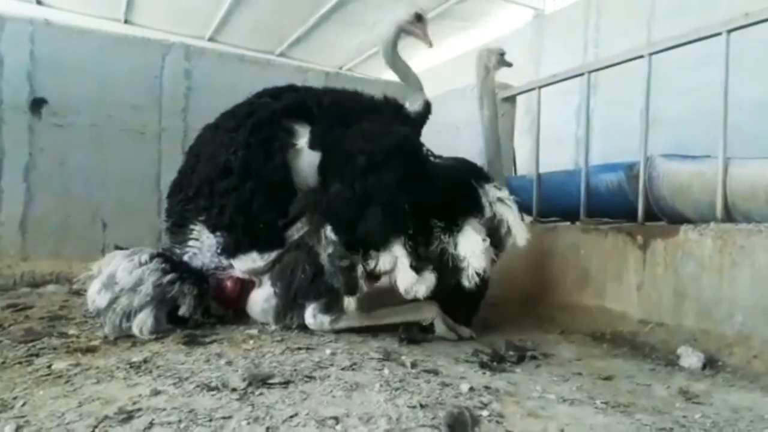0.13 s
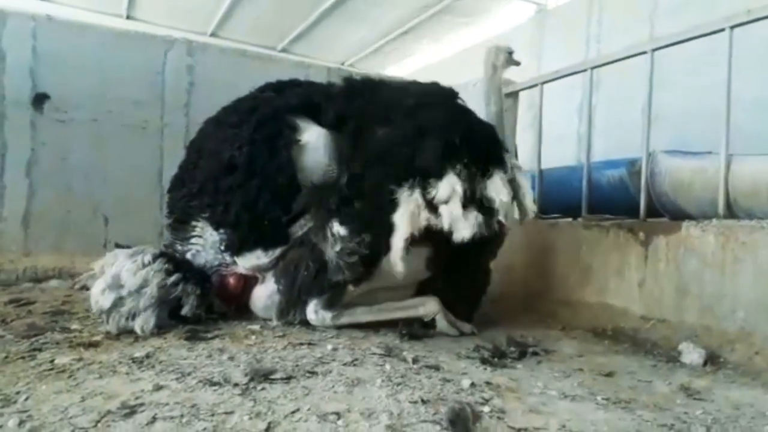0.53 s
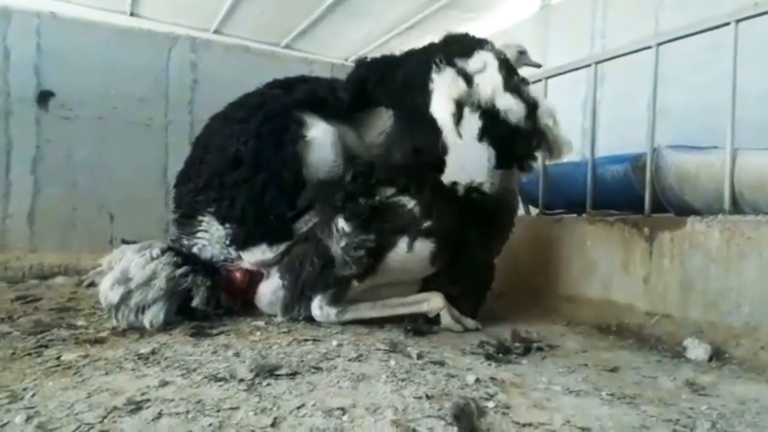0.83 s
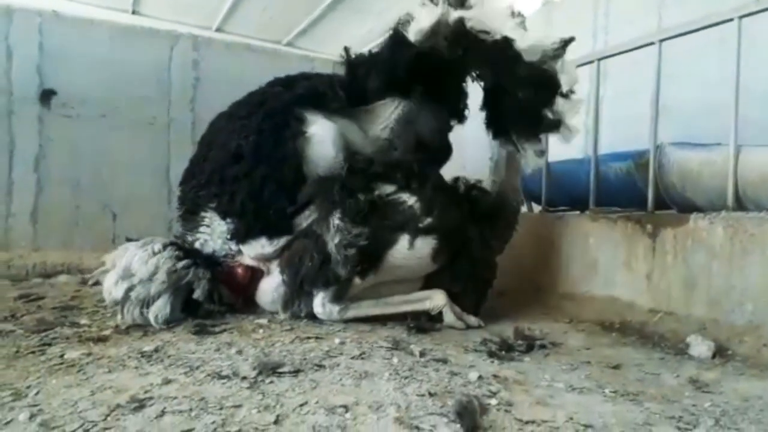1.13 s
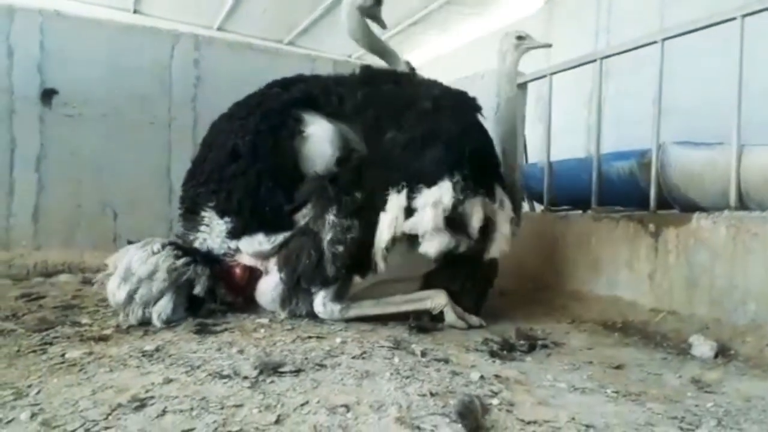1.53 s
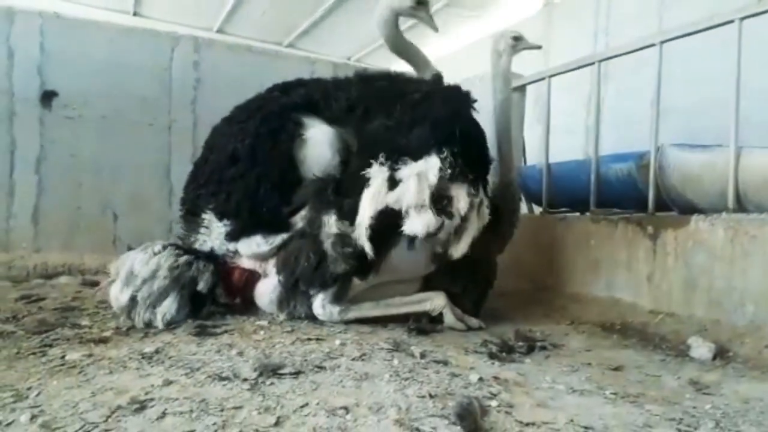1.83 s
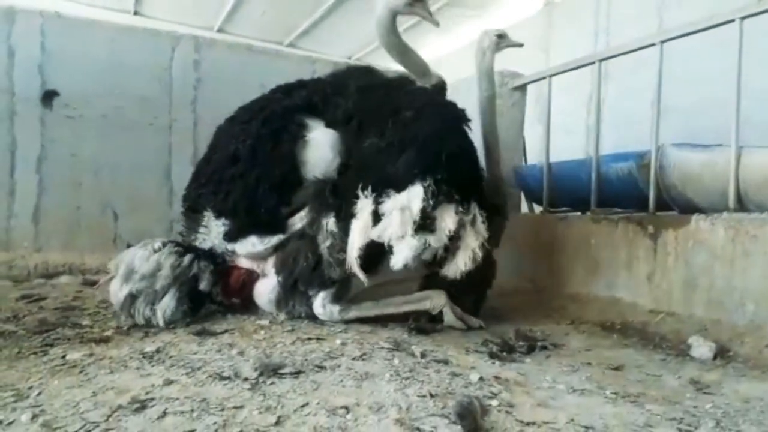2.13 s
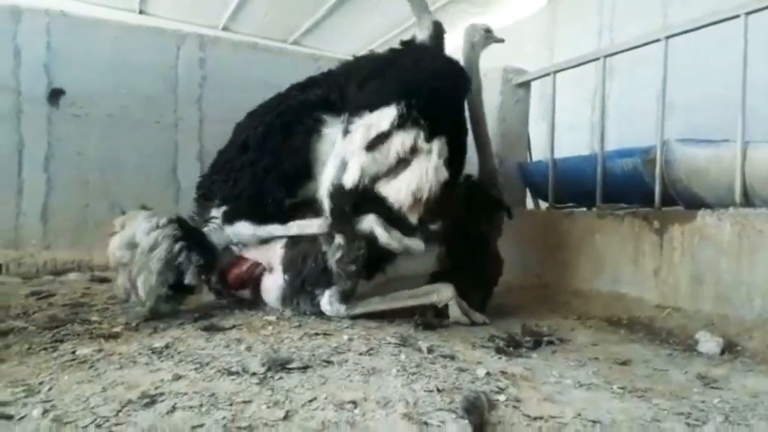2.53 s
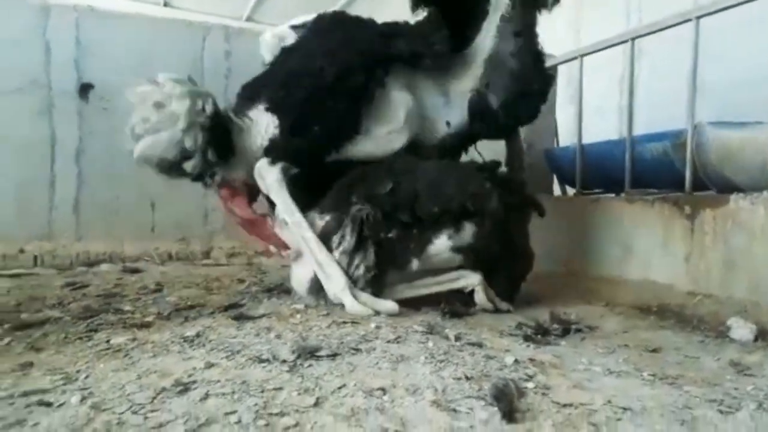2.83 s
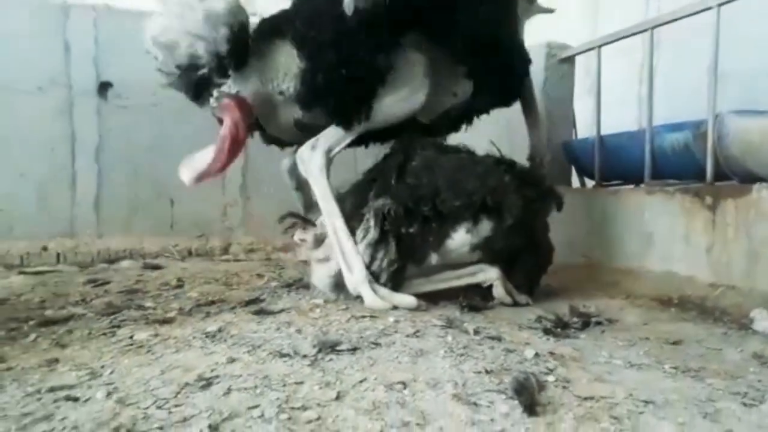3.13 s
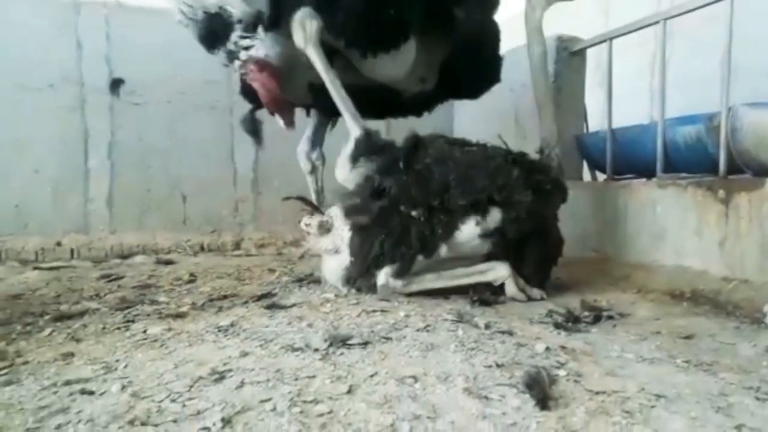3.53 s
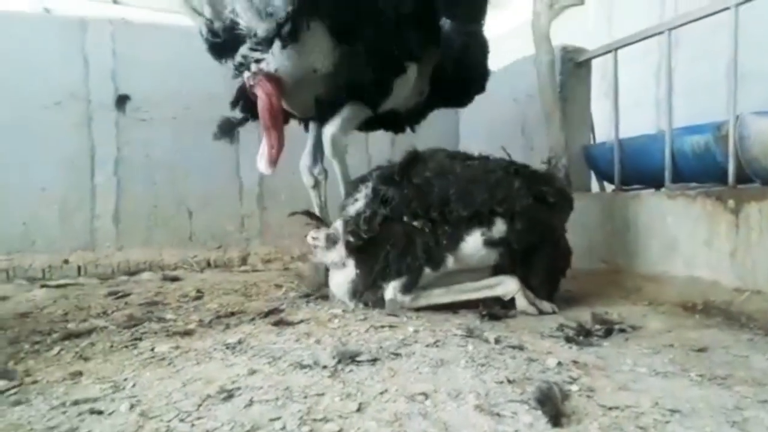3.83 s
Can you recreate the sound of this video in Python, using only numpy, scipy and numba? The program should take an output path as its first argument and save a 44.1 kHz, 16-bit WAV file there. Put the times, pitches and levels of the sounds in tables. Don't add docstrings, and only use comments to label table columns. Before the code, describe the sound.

The end of a low, raspy ostrich groan in a small hard-walled shed, then low wing-air bumps, quiet rustle and faint hum, finally a burst of footfalls, grit scuffs and claw clicks, on a dull phone microphone.

```python
import sys
import numpy as np
from scipy import signal
from scipy.io import wavfile
from scipy.ndimage import uniform_filter1d
from numba import njit

SR = 44100
rng = np.random.default_rng(int(sys.argv[2]) if len(sys.argv) > 2 else 0)


def generate_wav(sig):
    pcm = np.round(np.clip(np.atleast_2d(sig).T, -1, 1) * 32767).astype(np.int16)
    wavfile.write(sys.argv[1], SR, pcm)


def gain_from_db(level_db):
    decades = np.asarray(level_db, float) / 20
    return 10 ** decades


N = 176400


def unit(x):
    return x / np.sqrt(np.mean(x ** 2))


@njit
def svf(x, hz, width):
    y, b, l = np.empty(len(x)), 0., 0.
    g, k = np.tan(np.pi * hz / SR), width / hz
    for i in range(len(x)):
        v = (b + g * (x[i] - l)) / (1 + g * (g + k))
        b, l, y[i] = 2 * v - b, l + 2 * g * v, k * v
    return y


def resonate(x, hz, width_hz):
    hz, width_hz = float(hz), float(width_hz)
    return svf(svf(x, hz, width_hz), hz, width_hz)


def walk(rate_hz, size=N):
    k = int(SR / rate_hz)
    steps = np.repeat(rng.standard_normal(size // k + 1), k)
    return 1.855 * uniform_filter1d(uniform_filter1d(steps, k), k)[:size]


def grit():
    grains_per_s, uneven_db, bed = 2500, 2.5, .5
    hit = rng.random(N) < grains_per_s / SR
    grains = hit * rng.standard_normal(N) * gain_from_db(uneven_db * rng.exponential(size=N))
    return unit(grains + bed * rng.standard_normal(N))


def bands(spectrum, source):
    flicker_db = 1.8
    hz0, db0 = np.array(spectrum).T
    out, swell = 0, walk(5.42)
    for k, hz in enumerate(40 * 2 ** (np.arange(24) / 3)):
        db = np.interp(np.log(hz), np.log(hz0), db0) + flicker_db * (walk(18) + .5 * swell)
        shifted = np.roll(source, k * SR // 7)
        out = out + gain_from_db(db) * resonate(shifted, hz, hz / 3)
    return unit(out)


def boom():
    # time in seconds, pulse rate in Hz, effort in dB, airflow in dB,
    # brightness above the third harmonic in dB per octave.
    course = [
        (0, 68.06, -30.5, -30, -1.5),
        (.07, 69.9, -30, -27.5, -2),
        (0.141, 69.2, -36.5, -30, -1),
        (0.201, 65.74, -38.5, -35, -7),
        (0.269, 64.87, -37, -36, -2),
        (0.33, 62.95, -38.5, -34, 1.5),
        (.44, 60.24, -39.5, -42.5, -7),
        (0.521, 60.1, -49, -42.5, -19),
        (.62, 56.4, -61, -65, -6),
    ]
    # centre in Hz, width in Hz, level in dB.
    neck_modes = [(74.6, 9.3, -6), (120, 9.8, -3), (139.8, 14.6, -3), (182, 14, 2.5), (260.7, 6.6, -3.5),
                  (307.6, 13.8, -0.5), (346.5, 13, 0.5), (479, 43, -31.5), (575, 48, -26)]
    # centre in Hz, width in Hz, level in dB.
    throat_modes = [(750, 820, -13.5), (1266, 140, -10.5), (1668, 73, -5), (1770, 140, -5.5),
                    (1896, 30, 0.5), (2644, 130, -17), (4230, 750, -21), (5600, 1400, -34)]
    jitter, shimmer_db, growl_db, neck_broad = .012, 2.2, -10, 2.14
    rumble_db, rumble_hz, rumble_width_hz = -14, 210, 330
    rumble_lag = .75
    rasp_db, rasp_gate_cycles, air_flicker_db = -21, 0.94, 1.2

    lead, n = SR // 4, SR
    t = (np.arange(n) - lead) / SR
    s, hz, db, air_db, bright_db = np.array(course).T
    phase = np.cumsum(np.interp(t, s, hz) * (1 + jitter * walk(40.34, size=n))) / SR
    past_end_s = np.clip(t - s[-1], 0, 1)
    effort_db = np.interp(t, s, db) - 300 * past_end_s
    tilt_db = np.interp(t, s, bright_db)

    pulses = 0
    for k in range(1, 10):
        harmonic_db = shimmer_db * walk(30.3, size=n) + tilt_db * max(np.log2(k / 3), 0)
        pulses = pulses + gain_from_db(harmonic_db) * np.cos(2 * np.pi * k * phase)
    turbulence = rng.standard_normal(n)
    driven = (pulses + 10 * gain_from_db(growl_db) * turbulence) * gain_from_db(effort_db)
    voice = 0
    for k, (f, w, d) in enumerate(neck_modes):
        voice = voice + (-1) ** k * gain_from_db(d) * resonate(driven, f, neck_broad * w)

    rumble = unit(resonate(turbulence, rumble_hz, rumble_width_hz))
    rumble = rumble * gain_from_db(rumble_db + db[0] + rumble_lag * (effort_db - db[0]))

    gate = 0.47 + np.exp(-(phase % 1) / rasp_gate_cycles)
    flow_db = air_flicker_db * walk(27.25, size=n) + np.interp(t, s, air_db) - 380 * past_end_s
    air = rng.standard_normal(n) * gate * gain_from_db(flow_db)
    rasp = sum(gain_from_db(d) * resonate(air, f, 2 * w) for f, w, d in throat_modes)
    return np.r_[(voice + rumble + 10 * gain_from_db(rasp_db) * rasp)[lead:], np.zeros(N - n + lead)]


def rustle():
    # frequency in Hz, density in dB per Hz.
    spectrum = [(60, 0), (130, 3), (250, -1.5), (700, -6), (1200, -6.5), (2100, -5), (4200, -15),
                (7000, -35.5)]
    # time in seconds, level in dB.
    stir = [(.5, -59.5), (.7, -64.5), (1.1, -62.5), (1.45, -69), (1.55, -63), (2.0, -64), (2.4, -62),
            (2.55, -59), (2.7, -52.5), (2.95, -55.5), (3.12, -58), (3.18, -61.5), (3.35, -65.5),
            (3.55, -57), (3.75, -68), (3.9, -56.5)]
    stir_db = np.interp(np.arange(N) / SR, *np.array(stir).T)
    return bands(spectrum, grit()) * gain_from_db(stir_db - 1.5)


def shed_hum():
    # frequency in Hz, density in dB per Hz.
    spectrum = [(30, -39.5), (70, -8.5), (218, 3), (683, -21), (2430, -29.5), (4590, -22.5), (7000, -23)]
    return bands(spectrum, rng.standard_normal(N)) * gain_from_db(-67.5)


def knocks():
    # start in seconds, peak in dB, ring in Hz, t60 in seconds.
    hits = [(.367, -48.5, 3320, 0.054), (1.913, -55, 1530, 0.041), (1.938, -47.5, 1260, 0.016),
            (1.979, -45.5, 760, 0.01), (2.064, -51.5, 1520, 0.024), (2.153, -47, 670, 0.015),
            (2.178, -44, 660, 0.015), (2.214, -61, 2150, .02), (2.381, -52, 1620, .02),
            (2.446, -47.5, 590, 0.041), (2.513, -50, 2070, .02), (2.707, -37.5, 640, 0.038),
            (2.713, -40, 1230, .02), (2.773, -46, 613, 0.025), (2.791, -37.5, 1190, 0.02),
            (2.798, -40.5, 897, .03), (2.854, -42.5, 750, 0.037), (2.869, -32.5, 3950, 0.011),
            (2.869, -38.5, 1710, 0.02), (2.881, -43, 2210, 0.048), (2.91, -26.5, 1162, 0.024),
            (2.91, -30.5, 742, 0.027), (2.909, -35.5, 3530, 0.023), (2.91, -44, 4100, 0.034),
            (2.922, -44, 1104, 0.037), (2.997, -43.5, 534, 0.033), (3.022, -50, 6500, .008),
            (3.022, -47, 9500, .006), (3.022, -37, 12600, .008), (3.027, -39.5, 754, 0.026),
            (3.031, -36.5, 1133, 0.035), (3.029, -41.5, 4050, 0.028), (3.034, -40, 6900, .012),
            (3.034, -39, 5220, 0.014), (3.035, -46, 12300, .008), (3.047, -42.5, 4170, 0.013),
            (3.188, -41.5, 870, .015), (3.196, -43, 750, 0.025), (3.203, -53, 980, .02),
            (3.214, -49, 2300, 0.023), (3.254, -51, 1820, 0.033), (3.284, -39.5, 1050, 0.012),
            (3.383, -54.5, 2440, .02), (3.448, -48, 675, 0.017), (3.453, -47, 1150, 0.022),
            (3.48, -50.5, 1160, 0.024), (3.848, -52, 1600, .02), (3.889, -47, 1550, .02),
            (3.928, -46, 604, .03)]
    rise_s = 0.00035
    out, u = np.zeros(N + SR), np.arange(SR // 5) / SR
    for s, db, hz, t60_s in hits:
        ring = np.sin(2 * np.pi * hz * u) + 0.14 * np.sin(2 * np.pi * 0.99 * hz * u)
        ring = ring + 0.38 * unit(resonate(rng.standard_normal(len(u)), hz, hz / 2))
        shape = np.exp(-np.log(1000) * u / t60_s) * (1 - np.exp(-u / rise_s)) ** 2
        i = int(s * SR)
        out[i:i + len(u)] += 0.72 * gain_from_db(db) * ring * shape
    return out[:N]


def scuffs():
    # start in seconds, length in seconds, level in dB, centre in Hz, width in Hz.
    drags = [(0.679, 0.021, -54.5, 3190, 523), (1.133, 0.022, -57, 2280, 400),
             (0.55, 0.22, -75.5, 5600, 3100), (1.331, 0.03, -68.5, 3240, 400),
             (1.32, 0.033, -74, 4540, 500), (1.366, 0.015, -71, 1600, 250),
             (1.719, 0.033, -68.5, 2950, 1200), (1.744, 0.064, -66, 1680, 500),
             (1.865, 0.016, -68, 2900, 1500), (1.969, 0.061, -64, 1770, 2440),
             (2.226, 0.064, -68.5, 4560, 1530), (2.51, 0.054, -65, 2380, 3000),
             (2.596, 0.17, -64, 4640, 3020), (2.773, 0.04, -58, 1930, 2860), (2.684, 0.032, -60, 3900, 700),
             (2.784, 0.2, -68, 3930, 1210), (2.891, 0.059, -55.5, 2080, 315),
             (3.015, 0.036, -60.5, 5630, 5000), (3.183, 0.036, -57, 990, 1100),
             (3.21, 0.052, -63, 1840, 2000), (3.44, 0.13, -63, 1630, 2470),
             (3.436, 0.079, -67.5, 3400, 2480), (3.52, 0.032, -62, 2200, 700),
             (3.653, 0.038, -65, 2000, 495), (3.706, .03, -69, 1870, 400), (3.835, 0.14, -61.5, 1210, 2580)]
    rise_share, fall_s, flicker_db = 0.3, 0.013, 1.5
    out, u = np.zeros(N + SR), np.arange(SR // 2) / SR
    grains = grit() * gain_from_db(flicker_db * walk(90))
    for s, length_s, db, hz, width_hz in drags:
        i = int(s * SR)
        rise = np.clip(u / (rise_share * length_s), 0, 1)
        fall = np.exp(-np.clip(u - length_s, 0, 9) / fall_s)
        drag = unit(resonate(np.roll(grains, -i)[:len(u)], hz, width_hz))
        out[i:i + len(u)] += gain_from_db(db) * rise * fall * drag
    return out[:N]


def bumps(table, spread_cycles, snap_db):
    rise_share, sag, wake_db, wake_s = 0.65, 0.46, -14, 0.039
    out, u = np.zeros(N + SR), np.arange(-SR // 20, SR // 5) / SR
    for (s, db, hz), turn in zip(table, rng.random(len(table))):
        c = hz * u
        slow = np.where(c < 0, rise_share, 1) * spread_cycles
        sagging = c - sag * c * np.tanh(c) / 2
        swing = np.exp(-.5 * (c / slow) ** 2) * np.cos(2 * np.pi * (sagging + turn))
        snap = np.exp(-.5 * ((c + 0.28) / (0.52 * spread_cycles)) ** 2)
        snap = snap * np.cos(2 * np.pi * (2.74 * c + turn))
        wake = unit(resonate(rng.standard_normal(len(u)), hz, hz))
        wake = wake * np.exp(np.minimum(-u, 8 * u) / wake_s)
        i = int(s * SR) - SR // 20
        out[i:i + len(u)] += gain_from_db(db) * (swing + gain_from_db(snap_db) * snap + gain_from_db(wake_db) * wake)
    return out[:N]


def wing_puffs():
    # peak time in seconds, peak in dB, swing in Hz.
    strokes = [(.706, -45, 109), (.826, -36, 106), (.857, -44.5, 94), (.912, -42, 83), (.932, -38, 86),
               (.95, -50, 89), (.969, -41, 93), (1.009, -47, 81), (1.031, -51, 89), (1.122, -25.5, 113),
               (1.161, -33, 100.6), (1.187, -41, 149), (1.237, -39.5, 107), (1.265, -53, 100),
               (1.302, -40.5, 213), (1.306, -46, 80), (1.333, -54, 109), (1.354, -42.5, 90),
               (1.385, -61, 324), (1.491, -42.5, 111), (1.556, -57, 84), (1.58, -42.5, 121.5)]
    return bumps(strokes, spread_cycles=0.73, snap_db=-22)


def thuds():
    # peak time in seconds, peak in dB, swing in Hz.
    falls = [(1.887, -46, 214), (1.983, -47, 240), (2.158, -47, 166), (2.183, -46.5, 216),
             (2.462, -44, 218), (2.714, -39, 230), (2.748, -46, 205), (2.776, -34.5, 246),
             (2.799, -35.5, 249), (2.821, -48, 205), (2.854, -50, 200), (2.914, -46, 175),
             (2.937, -45.5, 202), (3.01, -42, 120), (3.045, -52, 102), (3.231, -45.5, 150), (3.4, -51, 80),
             (3.449, -53, 86), (3.831, -50, 159), (3.896, -42, 229), (3.933, -36.5, 200),
             (3.972, -42.5, 185)]
    return bumps(falls, spread_cycles=0.48, snap_db=-8.5)


@njit
def walls(x, lags, gain, damp):
    line, soft, out = np.zeros((8, 4096)), np.zeros(8), np.zeros(len(x))
    for i in range(len(x)):
        total = 0.
        for k in range(8):
            soft[k] += (1 - damp) * (gain[k] * line[k, (i - lags[k]) & 4095] - soft[k])
            total += soft[k]
        out[i] = soft[0] - soft[3] + soft[5] - soft[6]
        for k in range(8):
            line[k, i & 4095] = x[i] + soft[k] - total / 4
    return out


def pen_echo(sound):
    t60_s, damp, level_db = 0.33, 0.35, -14.5
    lags = np.array([677, 853, 1063, 1291, 1523, 1789, 2039, 2333])
    return gain_from_db(level_db) * walls(sound, lags, gain_from_db(-60 * lags / SR / t60_s), damp)


def scene():
    pen = boom() + rustle() + knocks() + scuffs() + thuds()
    mono = pen + pen_echo(pen) + shed_hum() + wing_puffs()
    return np.array([mono, mono])


def sos_filter(x, order, hz, kind="low"):
    return signal.sosfilt(signal.butter(order, hz, kind, fs=SR, output="sos"), x)


def top_cut(x):
    return signal.sosfilt(signal.butter(12, 14290, fs=SR, output="sos"), x)


def record(dry):
    # centre in Hz, width in Hz, boost in dB.
    port = [(1170, 180, -9), (2000, 1300, -13), (4280, 590, -4.5)]
    open_s, mic_hz, bass_hz, top_hz = .003, 6800, 43.2, 13050
    hiss_db, hiss_follow_db, hiss_hz = -80, -32, 8000
    wide_hz, wide_db, leak_db = 4440, -7.5, -45.5
    offset = -.0005

    fade_in = np.minimum(np.arange(N) / SR / open_s, 1)
    mono = sos_filter(dry[0] * fade_in, 3, mic_hz)
    mono = sos_filter(mono, 2, bass_hz, "high")
    mono = mono + sum(gain_from_db(d) * svf(mono, float(f), float(w)) for f, w, d in port)

    busy = np.abs(uniform_filter1d(sos_filter(mono, 2, 1000, "high") ** 2, size=1024))
    hiss = unit(sos_filter(rng.standard_normal(N), 1, hiss_hz, "high"))
    mono = mono + np.sqrt(gain_from_db(2 * hiss_db) + gain_from_db(2 * hiss_follow_db) * busy) * hiss

    treble = sos_filter(mono, 6, wide_hz, "high")
    side = sos_filter(treble * walk(1500), 6, wide_hz, "high") * gain_from_db(wide_db)
    side = side + gain_from_db(leak_db) * walk(300) * svf(mono, 700., 900.)
    both = mono + side * np.array([[1], [-1]])
    both = signal.sosfilt(signal.ellip(10, .2, 60, top_hz, fs=SR, output="sos"), both)
    return top_cut(both + offset)


dry = scene()
out = record(dry)
generate_wav(out)
```